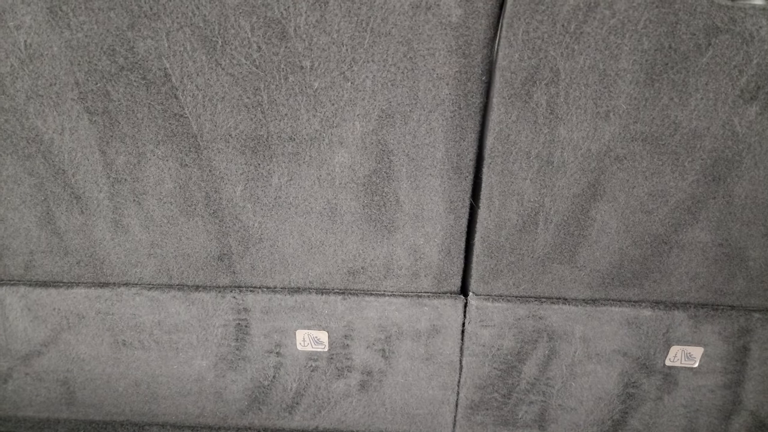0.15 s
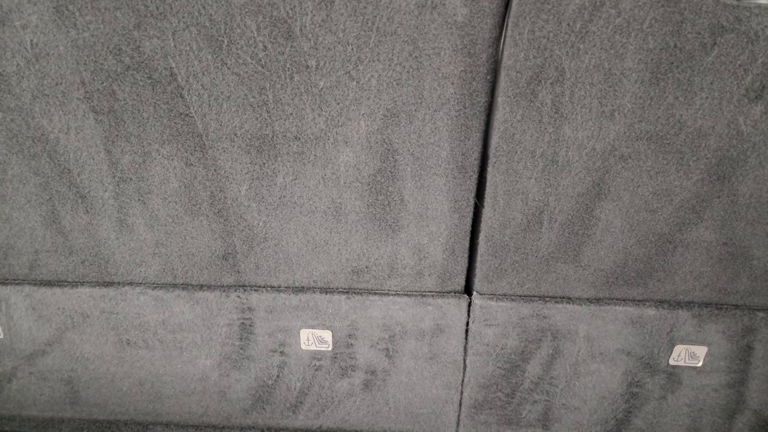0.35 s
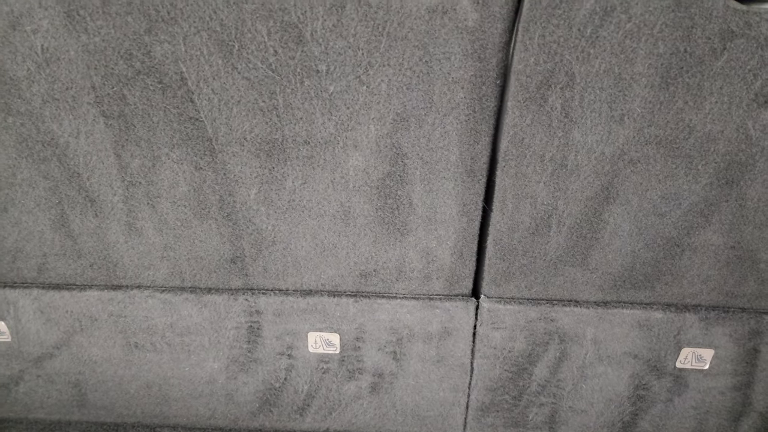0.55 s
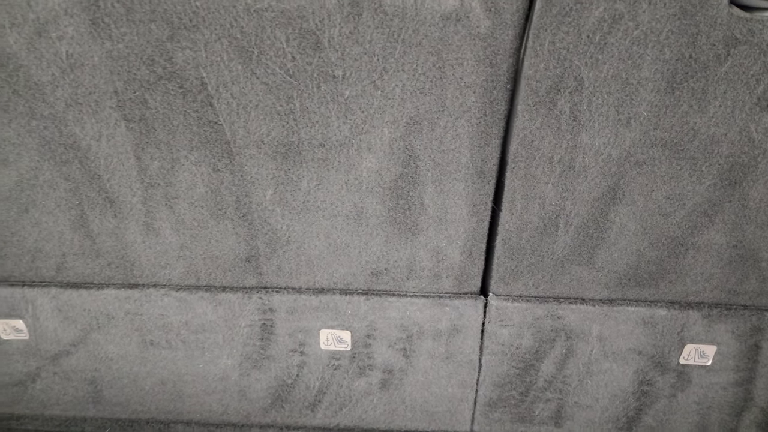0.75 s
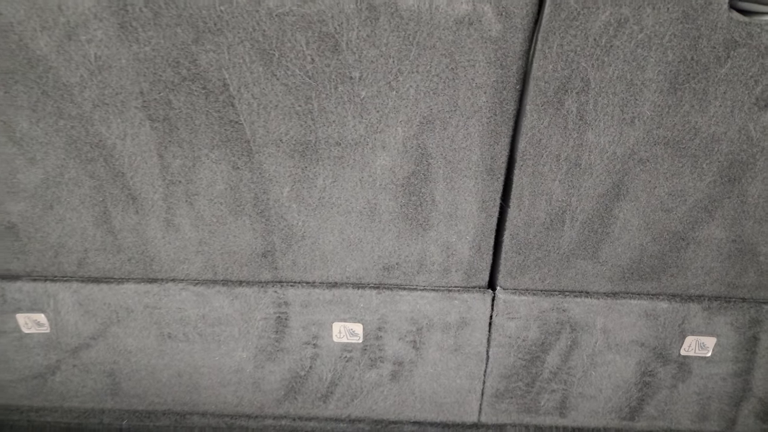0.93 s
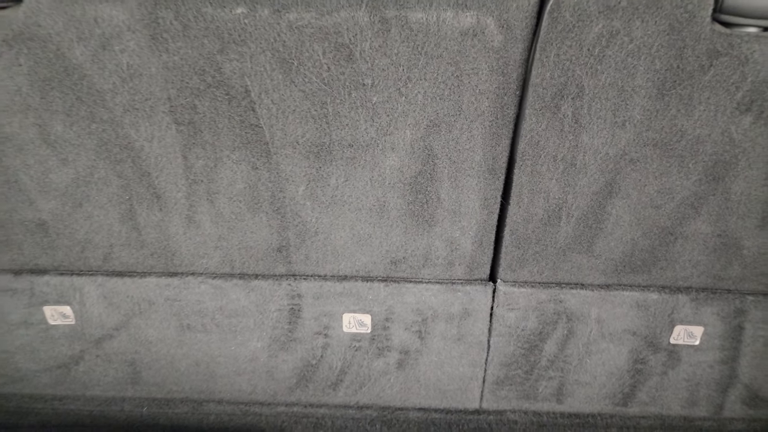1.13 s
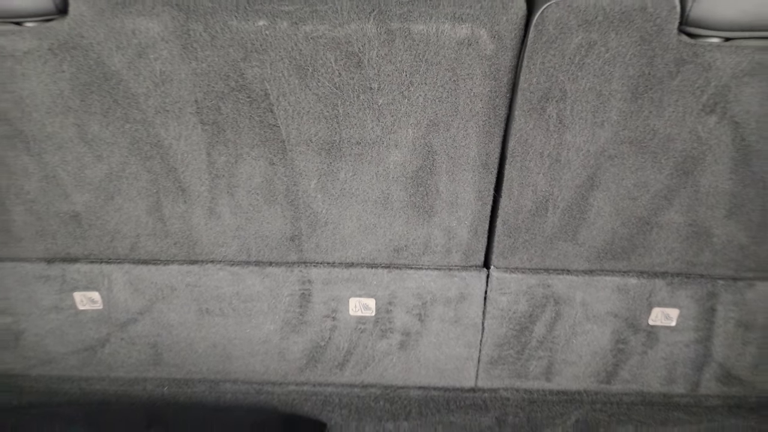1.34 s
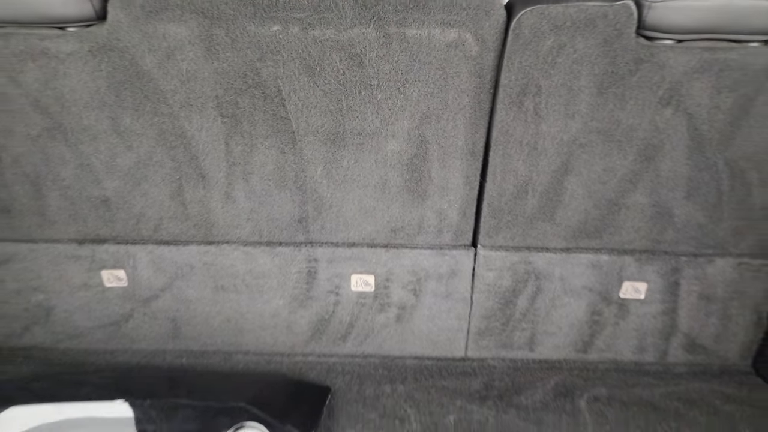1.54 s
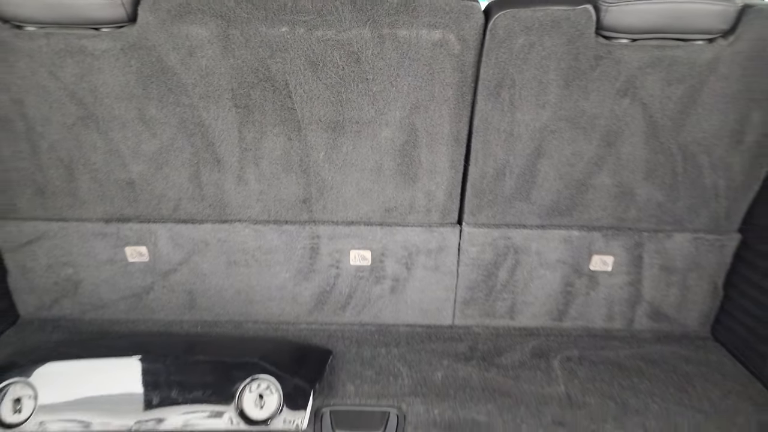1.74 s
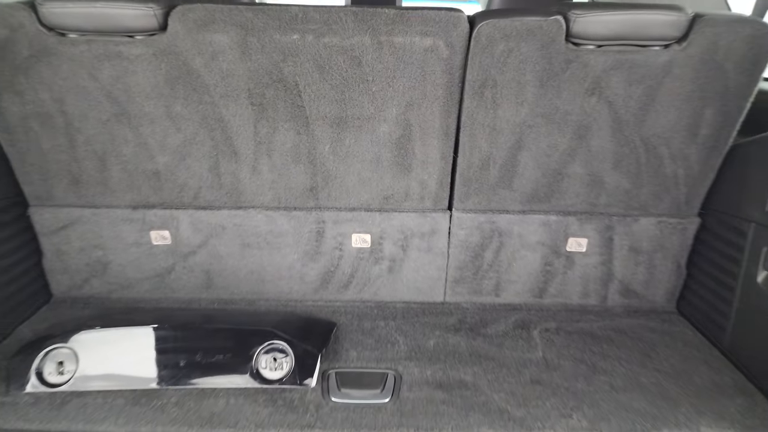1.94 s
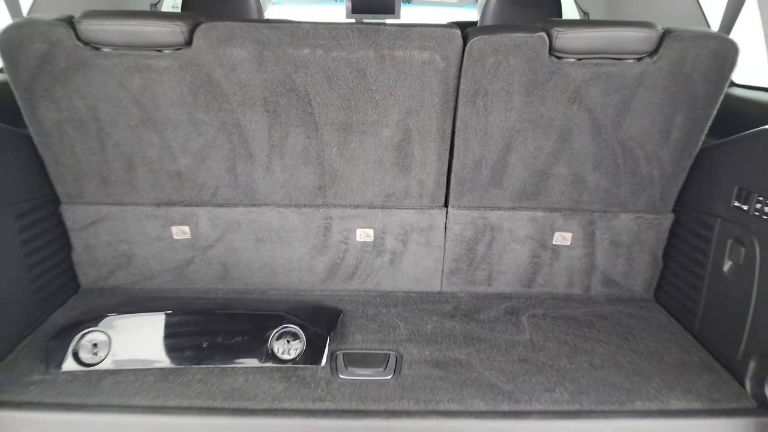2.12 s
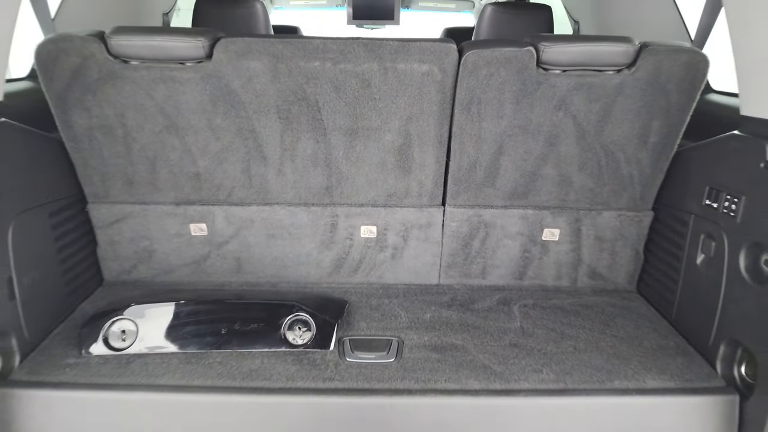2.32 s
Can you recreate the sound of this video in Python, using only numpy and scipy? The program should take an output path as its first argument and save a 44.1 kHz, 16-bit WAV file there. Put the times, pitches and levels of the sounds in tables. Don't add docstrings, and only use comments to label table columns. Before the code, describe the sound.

Power-folding car seatbacks, heard close in an open cargo bay within a reverberant hall. Soft low thuds, ticks and trim rustle open until 0.3 s. A small motor whirs upward from 0.35 s, a louder second from 0.49 s; plastic clacks stop them around 0.6 and 0.75 s. After a quiet gap, heavy clunks land at 1.22 and 1.38 s, then rustling and knocks fade by 2.1 s.

```python
import sys
import numpy as np
from scipy import signal
from scipy.fft import rfft, irfft
from scipy.io import wavfile
from scipy.ndimage import uniform_filter1d

SR = 44100
rng = np.random.default_rng(int(sys.argv[2]) if len(sys.argv) > 2 else 0)


def invert_db(x):
    u = np.asarray(x, float) / 20
    return 10 ** u


def materialize(psi):
    bounded = np.clip(np.atleast_2d(psi).T, -1, 1)
    quanta = np.round(bounded * 32767).astype(np.int16)
    wavfile.write(sys.argv[1], SR, quanta)


N = 104737

# (frequency [Hz], density [dB per Hz])
AIR_SPECTRUM = [(160, -25), (420, -9), (550, 3.5), (900, 0.5), (1700, -3.5), (2100, -49), (9000, -38)]
RUMBLE_SPECTRUM = [(30, 1), (75, -4), (120, -16), (170, -40.5)]
HISS_SPECTRUM = [(1760, -21), (3000, 12), (5710, -4), (6650, -19), (8500, -3), (13400, 1.5), (15700, 8)]
AIR_DB, RUMBLE_DB, HISS_DB = -63.5, -69.5, -80.5

# (time [s], level [dB])
STIR_LEVEL = [(0, -44), (.045, -41.5), (.11, -46.5), (.2, -44), (.3, -48.5), (.4, -51.5), (.6, -59.5)]
SETTLE_LEVEL = [(1.19, -51), (1.3, -48), (1.45, -42), (1.6, -47), (1.8, -50.5), (1.95, -53), (2.1, -69),
                (2.37, -88.5)]
# (frequency [Hz], density [dB per Hz])
STIR_SPECTRUM = [(25, -1), (80, -2.5), (200, -9.5), (450, -2), (1600, -19), (2100, -29.5), (5000, -36),
                 (7500, -57)]
SETTLE_SPECTRUM = [(30, -5), (80, -6), (170, -4.5), (350, -1.5), (700, -2), (1650, -8.5), (2300, -20),
                   (9000, -48)]

# (time [s], level [dB], pitch [Hz])
FLOOR_THUMPS = [(0.016, -45.5, 93.6), (0.09, -40.5, 87.4), (0.232, -43, 86), (0.49, -54, 135),
                (0.619, -45.5, 100), (0.708, -57.5, 148.6), (0.811, -61, 125), (0.902, -67.5, 110),
                (1.224, -42, 113), (1.414, -33.5, 108.6), (1.552, -45.5, 89), (1.639, -56, 79.4),
                (1.749, -53, 94.6), (1.828, -55, 75.6)]
THUMP_S = 0.012

# (time [s], peak [dB], t60 [s], brightness [dB per
TICKS = [(0.0736, -72, 0.045, 3.5), (0.1435, -58, 0.078, -4.5), (0.2038, -56.5, 0.021, 5),
         (0.2134, -55, 0.067, 4), (0.254, -65.5, 0.082, 2), (0.274, -60.5, 0.069, -2.5),
         (1.1768, -61, 0.048, -2.5), (1.2245, -51.5, 0.17, 1), (1.3833, -40.5, 0.1, 0),
         (1.4122, -44.5, 0.056, 1.5), (1.4334, -57.5, 0.1, 5), (1.8207, -67, 0.071, -0.5),
         (1.8913, -74.5, 0.052, 11), (1.687, -73, 0.039, 3.5), (1.759, -76, 0.037, 4),
         (1.941, -69, 0.036, -1.5)]
# (frequency [Hz], density [dB per Hz])
TICK_PUFF = [(880, -48), (1500, 2.5), (3850, -11.5), (4420, -9.5), (7590, -21.5), (9420, -19.5),
             (15700, -29.5)]

# (time [s], pitch [Hz])
SPEED_A = [(0.35, 239.6), (0.36, 352.4), (0.376, 526.3), (0.394, 710.2), (0.416, 966.0), (0.456, 1317),
           (0.474, 1433), (0.538, 1609), (0.605, 1578)]
SPEED_B = [(0.485, 253), (0.493, 349), (0.503, 462.7), (0.521, 635.3), (0.539, 831.4), (0.579, 1228),
           (0.621, 1459), (0.649, 1519), (0.745, 1531)]
# (time [s], level [dB])
LOAD_A = [(0.352, -47), (.38, -45.5), (0.41, -47.5), (.445, -41.5), (.48, -42), (.51, -43), (0.55, -41.5),
          (0.576, -43.5), (.605, -45)]
LOAD_B = [(.485, -57), (.51, -43.5), (0.536, -31.5), (.57, -34.5), (.6, -36.5), (.63, -34), (.68, -33),
          (0.731, -35.5), (0.747, -34)]
HARMONICS_A = [-0.5, 2.5, 8.5, -8.5, -16, -20, -23.5]
HARMONICS_B = [-0.5, -0.5, -5, -13, -40, -23.5]
# (frequency [Hz], width [Hz], gain [dB])
HOUSING_BANDS = [(650, 420, -12.5), (1000, 280, -12.5), (1290, 340, -5.5), (1520, 134, -2),
                 (1760, 253, -8.5), (2560, 210, -14.5), (2878, 260, -7.5), (3190, 216, -10.5),
                 (4800, 480, -9), (6373, 840, 0.5), (7600, 710, -8.5), (9680, 900, -7)]
# (frequency [Hz], density [dB per Hz])
GEAR_SPECTRUM = [(150, -9), (400, 6.5), (1400, 2.5), (4000, 0.5), (9500, -31.5), (11000, -24), (15500, -35)]
HOUSING_FLOOR_DB, SHELL_FLOOR = -26, 0.1
WAVER, FLUTTER_DB, SWEEP_FLUTTER_DB = 0.0012, 1.2, 3.5
SKIRT_DB, SKIRT_DB_PER_ORDER, SKIRT_HZ = -23, 3.5, 190
UPPER_ONSET = 3

# (frequency [Hz], density [dB per Hz])
SQUEAL_SPECTRUM = [(5800, -36), (6600, -1), (7150, -12), (7700, -12), (8300, -41)]
SQUEAL_CENTRE_S, SQUEAL_SPREAD_S, SQUEAL_DB = 0.438, 0.015, -62

# (time [s], peak [dB], t60 [s], brightness [dB per octave], own ring [Hz])
CLACKS = [(0.598, -39, 0.027, 4, 1446), (0.603, -29.5, 0.063, 4.5, 860), (0.624, -35.5, 0.041, -5, 532),
          (0.651, -35.5, 0.046, -1, 894), (0.74, -31, 0.06, 3.5, 1300), (0.745, -31.5, 0.063, 1.5, 958),
          (0.788, -35, 0.14, 0, 1112), (0.793, -38, 0.08, -4, 1520), (0.823, -45, 0.068, -5.5, 680.2),
          (0.91, -47, 0.1, 1, 490), (1.021, -46, 0.048, 0, 650)]
# (frequency [Hz], level [dB], t60 [s])
LATCH_MODES = [(570, 1.5, 0.028), (955, -7.5, 0.066), (1300, -2, 0.045), (1520, 0.5, 0.053),
               (2153, -1.5, 0.032), (2720, -8, 0.04), (2930, -13, .05), (4830, -23, 0.024)]
# (frequency [Hz], density [dB per Hz])
LATCH_PUFF = [(120, -37), (200, -12.5), (646, 2.5), (1420, -6), (4060, -17.5), (4810, -24.5), (8000, -36.5),
              (10400, -53), (17600, -120)]

# (time [s], peak [dB], t60 [s], brightness [dB per octave], own ring [Hz])
KNOCKS = [(1.183, -43, 0.21, 0, 229), (1.188, -42, 0.079, -3, 583), (1.208, -61, 0.083, 4, 240),
          (1.263, -54, 0.28, 4.5, 540), (1.314, -34.5, 0.063, -3.5, 906), (1.549, -38, 0.07, -3, 411),
          (1.599, -45.5, 0.068, 1, 550), (1.691, -40, 0.24, -1, 480), (1.759, -49.5, 0.061, -1.5, 687),
          (1.811, -48, 0.1, 0, 613), (1.861, -49.5, 0.082, -1, 390), (1.89, -45.5, 0.14, -2.5, 645),
          (1.94, -48, 0.15, -1, 610), (2.063, -56, 0.15, 1, 570)]
# (frequency [Hz], level [dB], t60 [s])
SEAT_MODES = [(106.5, -20, 0.13), (341, -10, 0.056), (459, -2.5, 0.049), (908, -10.5, 0.098),
              (1102, -5, 0.064), (2100, -22.5, 0.035)]
# (frequency [Hz], density [dB per Hz])
SEAT_PUFF = [(45, -34), (100, -7.5), (572, 1), (1010, -3), (2540, -18.5), (4750, -23.5), (6500, -34.5),
             (8450, -72), (14300, -120)]
# (time [s], peak [dB], t60 [s], brightness [dB per octave])
SLAM_A = [
    (1.221, -21.5, 0.085, 0.013),
]
SLAM_B = [
    (1.379, -23.5, 0.071, 0),
    (1.412, -30.5, 0.074, 0),
]
# (frequency [Hz], level [dB], t60 [s])
FRAME_A = [(109, -15.5, .15), (224.4, -15, 0.053), (398, -11.5, 0.031), (533, 3.5, 0.049), (629, -8, 0.049),
           (834, -11, 0.052), (1004, -9.5, 0.07), (1310, -24, 0.026), (2340, -21, 0.045)]
FRAME_B = [(100, -18, 0.12), (278, -9.5, 0.094), (499, -2, 0.055), (650, 3, 0.031), (904, -6.5, 0.087),
           (1054, -2.5, 0.046), (1300, -20, 0.055), (1887, -16, 0.047), (2295, -17, 0.024)]
OWN_RING_DB, OWN_RING_T60_S = 7, 0.048

# (frequency [Hz], t60 [s])
HALL_T60 = [(100, 0.67), (250, 1.28), (800, 2.27), (2000, 2), (5000, 2.05), (6500, 0.97), (8000, 0.67)]
BAY_T60_S, BAY_DB, HALL_DB, HALL_MOTOR_DB = 0.13, -11, -12.5, -17


def evened(x):
    return x / np.sqrt(np.mean(x ** 2) + 1e-20)


def read(points, hz):
    f, value = np.transpose(points)
    return np.interp(np.log(hz + 1), np.log(f + 1), value)


def add(mix, start_s, sound):
    part = mix[round(start_s * SR):][:len(sound)]
    part += sound[:len(part)]


def noise(size, spectrum, tilt_db=0):
    return coloured(rng.standard_normal(size), spectrum, tilt_db)


def coloured(x, spectrum, tilt_db=0):
    hz = np.fft.rfftfreq(len(x), 1 / SR)
    gain_db = read(spectrum, hz) + tilt_db * np.log2((hz + 50) / 1000)
    return evened(irfft(rfft(x) * invert_db(gain_db), len(x)))


def slow(size, span_s):
    width = max(int(span_s * SR), 2)
    drift = uniform_filter1d(rng.standard_normal(size), width)
    return evened(uniform_filter1d(drift, width))


def background():
    air = invert_db(AIR_DB) * noise(N, AIR_SPECTRUM)
    hiss = invert_db(HISS_DB) * noise(N, HISS_SPECTRUM)
    rumble = invert_db(RUMBLE_DB + 2.3 * slow(N, 0.047)) * noise(N, RUMBLE_SPECTRUM)
    return air + hiss + rumble


def rustle(curve, spectrum, grain_db, lump_db):
    at_s, level_db = np.transpose(curve)
    t = np.arange(N) / SR
    uneven_db = grain_db * slow(N, 0.0026) + lump_db * slow(N, 0.094)
    bumps = rng.standard_normal(N) * invert_db(uneven_db)
    gate = np.clip(np.minimum(t - at_s[0] + 0.0051, at_s[-1] + 0.0045 - t) / 0.0026, 0, 1)
    return coloured(bumps, spectrum) * invert_db(np.interp(t, at_s, level_db)) * gate


def floor_thumps():
    out = np.zeros(N)
    u = np.arange(8192) / SR / THUMP_S
    swell = np.e * u * np.exp(-u)
    for start_s, db, hz in FLOOR_THUMPS:
        add(out, start_s, invert_db(db) * swell * np.sin(2 * np.pi * hz * THUMP_S * u))
    return out


def mode(t, hz, db, t60_s, cycles):
    return 2 * invert_db(db - 60 * t / t60_s) * np.sin(2 * np.pi * (hz * t + cycles))


def blows(events, modes, puff, puff_db, rise_s, detune):
    out = np.zeros(N)
    t = np.arange(8192) / SR
    for start_s, peak_db, t60_s, tilt_db, *own_hz in events:
        hit = invert_db(puff_db - 60 * t / t60_s) * noise(len(t), puff, tilt_db)
        stretch = 10 * t60_s
        for f, db, ring_s in modes:
            hz = f * (1 + detune * rng.uniform(-1, 1))
            mode_db = db + tilt_db * np.log2(f / 1000)
            hit += mode(t, hz, mode_db, ring_s * stretch, rng.uniform(0, 0.5))
        for f in own_hz:
            mode_db = OWN_RING_DB + tilt_db * np.log2(f / 1000)
            hit += mode(t, f, mode_db, OWN_RING_T60_S * stretch, 0.25)
        hit *= np.minimum(t / rise_s, 1) ** 2
        add(out, start_s, invert_db(peak_db) * hit / np.sqrt(np.mean(hit[:400] ** 2)))
    return out


def trim_ticks():
    return blows(TICKS, [], TICK_PUFF, puff_db=0, rise_s=0.0025, detune=0)


def housing_gain(hz):
    bands = sum(invert_db(db) / (1 + (2 * (hz - f) / width) ** 4) for f, width, db in HOUSING_BANDS)
    return invert_db(HOUSING_FLOOR_DB) + bands


def motor(speed_curve, load, harmonics_db, gear_db):
    at_s, pitch_hz = np.transpose(speed_curve)
    start_s, stop_s, top_hz = at_s[0], at_s[-1], pitch_hz.max()
    t = np.arange(start_s, stop_s, 1 / SR)
    size = len(t)
    speed = uniform_filter1d(np.interp(t, at_s, pitch_hz), size=700, mode="nearest")
    hz = speed * (1 + WAVER * slow(size, 0.0037))
    turn = 2 * np.pi * np.cumsum(hz) / SR

    still_to_rise = np.clip(4 * (0.95 - np.maximum.accumulate(speed) / top_hz), 0, 1)
    sweep_db = SWEEP_FLUTTER_DB * np.sqrt(still_to_rise)
    tone = np.zeros(size)
    for k, db in enumerate(harmonics_db, 1):
        fuzz = slow(size, 0.5 / SKIRT_HZ) + 1j * slow(size, 0.5 / SKIRT_HZ)
        skirt = invert_db(SKIRT_DB + SKIRT_DB_PER_ORDER * (k - 0.5) + sweep_db) * fuzz
        onset = (hz / top_hz) ** (UPPER_ONSET * max(k - 2, 0))
        level = invert_db(db + (FLUTTER_DB + sweep_db) * slow(size, 0.015))
        wave = ((1 + skirt) * np.exp(1j * k * turn)).real
        tone += np.sqrt(2) * housing_gain(k * hz) * onset * level * wave

    shell = SHELL_FLOOR + housing_gain(np.fft.rfftfreq(size, 1 / SR))
    teeth = evened(irfft(rfft(noise(size, GEAR_SPECTRUM)) * shell, size))
    gear = invert_db(gear_db + slow(size, 0.00073)) * (hz / top_hz) ** 2 * teeth
    stop_fade = np.clip((stop_s - t) / 0.00087, 0, 1)
    return start_s, (tone + gear) * stop_fade * invert_db(np.interp(t, *np.transpose(load)))


def brush_squeal():
    t = np.arange(N) / SR
    grit = noise(N, SQUEAL_SPECTRUM) * invert_db(SQUEAL_DB + 2 * slow(N, 0.005))
    return grit * np.exp(-0.5 * ((t - SQUEAL_CENTRE_S) / SQUEAL_SPREAD_S) ** 2)


def latch_clacks():
    return blows(CLACKS, LATCH_MODES, LATCH_PUFF, puff_db=4.5, rise_s=0.003, detune=0.03)


def seat_knocks():
    return blows(KNOCKS, SEAT_MODES, SEAT_PUFF, puff_db=4, rise_s=0.0043, detune=0.092)


def seat_slams():
    first = blows(SLAM_A, FRAME_A, SEAT_PUFF, puff_db=1, rise_s=0.0039, detune=0)
    second = blows(SLAM_B, FRAME_B, SEAT_PUFF, puff_db=1, rise_s=0.0039, detune=0)
    return first + second


def tail(x, t60s, length, gap_s):
    taps = np.zeros(length)
    at = np.arange(int(gap_s * SR), length - 20, 20)
    taps[at + rng.integers(0, 20, len(at))] = rng.choice([-1., 1.], len(at))
    hz, t, z = signal.stft(taps, SR, nperseg=256)
    decay = invert_db(-60 * t / read(t60s, hz)[:, None])
    echo = signal.istft(z * decay, SR, nperseg=256)[1]
    return signal.fftconvolve(x, echo / np.linalg.norm(echo))[:N]


def scene():
    moving = rustle(STIR_LEVEL, STIR_SPECTRUM, grain_db=-2.0, lump_db=2.9)
    moving += rustle(SETTLE_LEVEL, SETTLE_SPECTRUM, grain_db=0.0, lump_db=-2.5)
    whine = np.zeros(N)
    add(whine, *motor(SPEED_A, LOAD_A, HARMONICS_A, gear_db=-0.5))
    add(whine, *motor(SPEED_B, LOAD_B, HARMONICS_B, gear_db=-6))
    clacks = latch_clacks()
    hits = trim_ticks() + seat_knocks() + seat_slams()
    near = whine + clacks + hits

    bay_t60 = [(100, BAY_T60_S), (10000, 0.35 * BAY_T60_S)]
    bay = invert_db(BAY_DB) * tail(near, bay_t60, length=SR // 2, gap_s=0.003)
    to_hall = invert_db(HALL_MOTOR_DB) * (whine * slow(N, 0.0074) + clacks) + invert_db(HALL_DB) * hits
    hall = tail(to_hall, HALL_T60, length=2 * SR, gap_s=0.02)
    return (near + bay + hall + background() + moving + floor_thumps() + brush_squeal())[None]


def top_cut(x):
    return signal.sosfilt(signal.butter(12, 16370, fs=SR, output="sos"), x)


def record(dry):
    high_pass = signal.butter(2, 55, "high", fs=SR, output="sos")
    low_pass = signal.firwin(1023, 15760, fs=SR)
    band = signal.oaconvolve(signal.sosfilt(high_pass, dry), low_pass[None], "same")
    return top_cut(band)


dry = scene()
out = record(dry)
materialize(out)
```